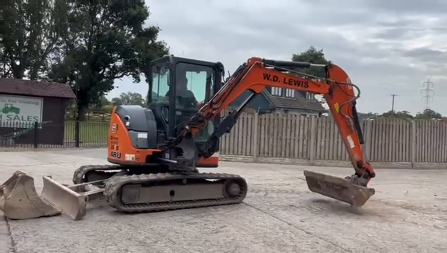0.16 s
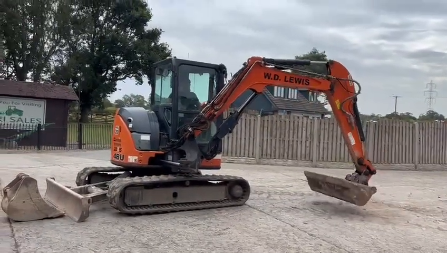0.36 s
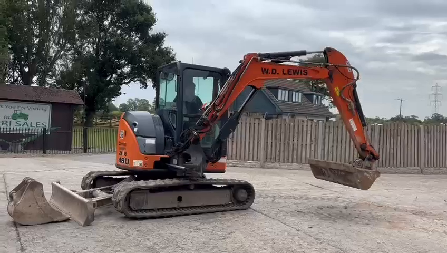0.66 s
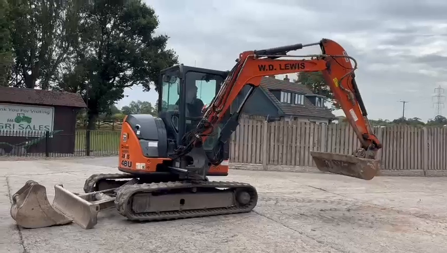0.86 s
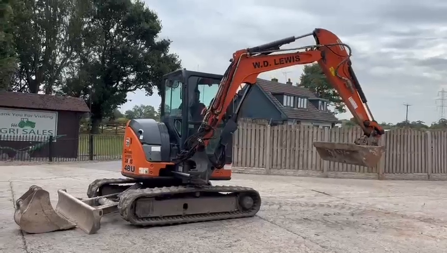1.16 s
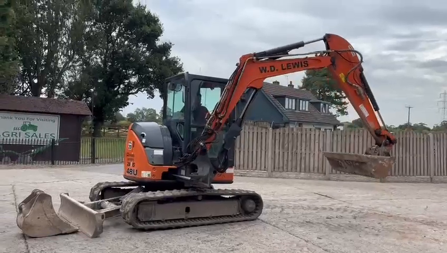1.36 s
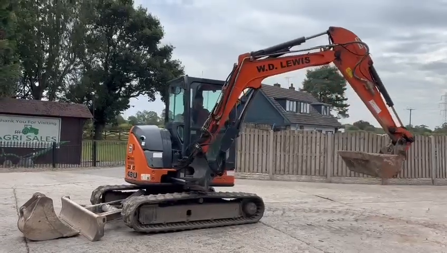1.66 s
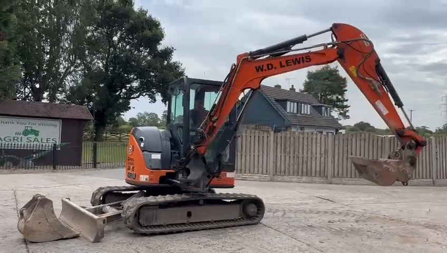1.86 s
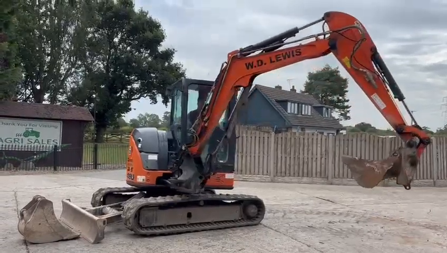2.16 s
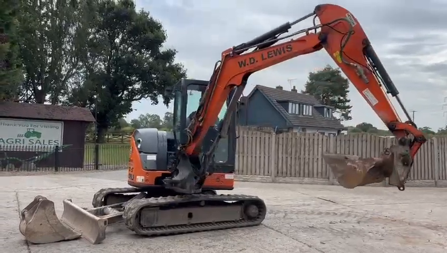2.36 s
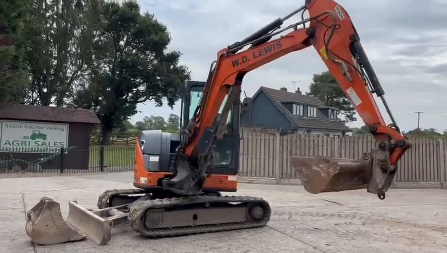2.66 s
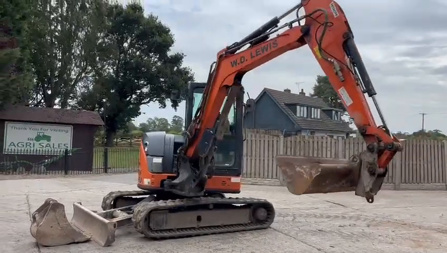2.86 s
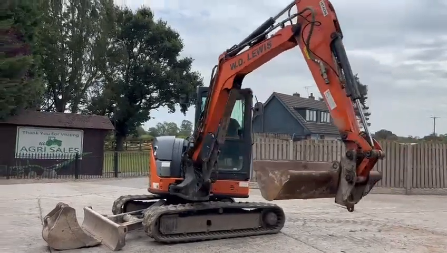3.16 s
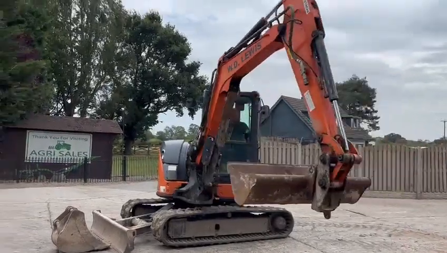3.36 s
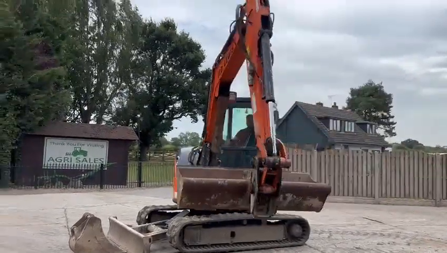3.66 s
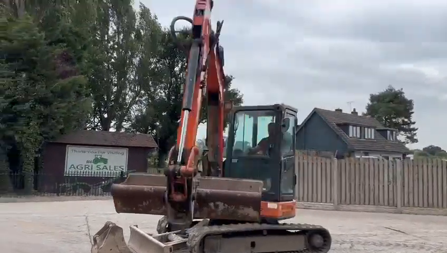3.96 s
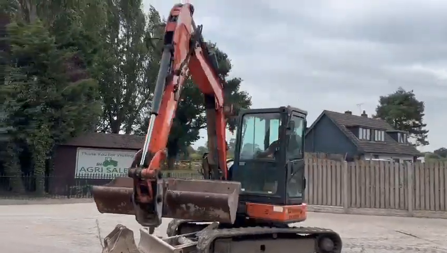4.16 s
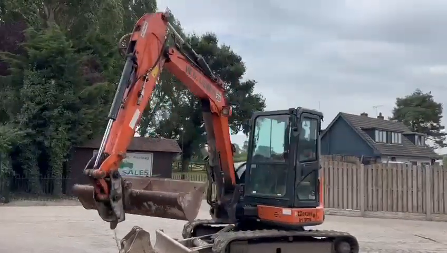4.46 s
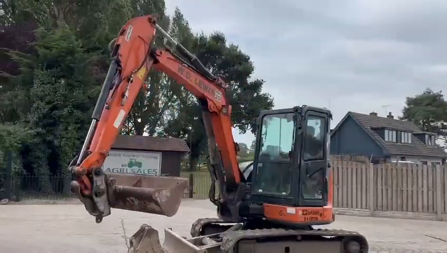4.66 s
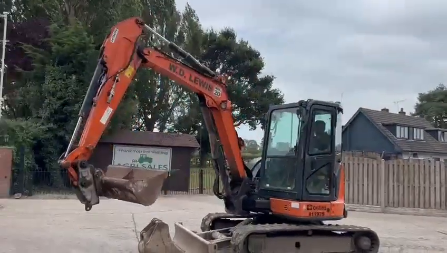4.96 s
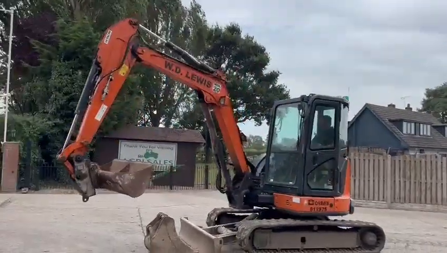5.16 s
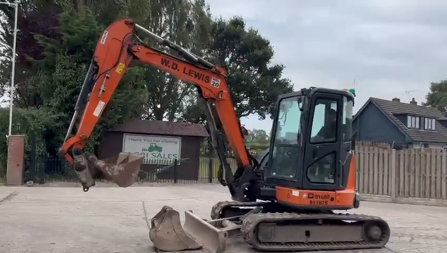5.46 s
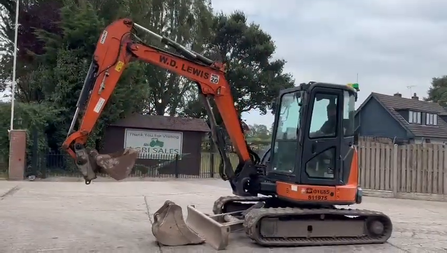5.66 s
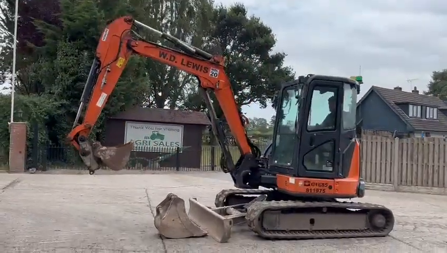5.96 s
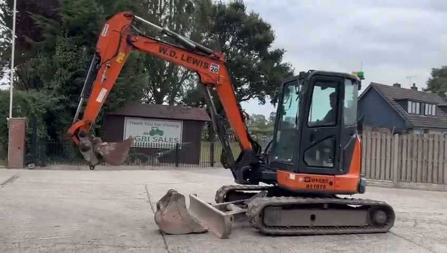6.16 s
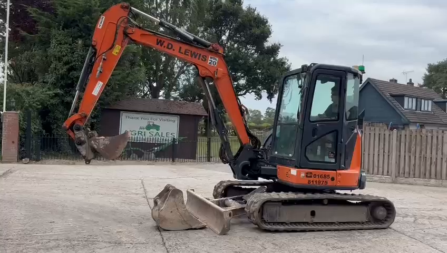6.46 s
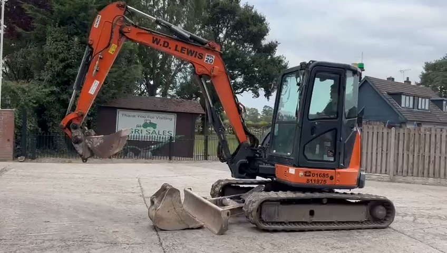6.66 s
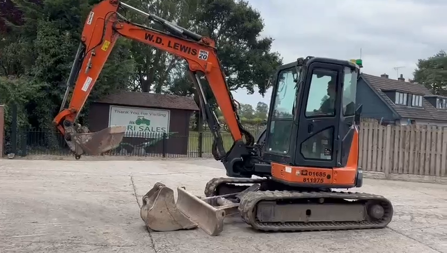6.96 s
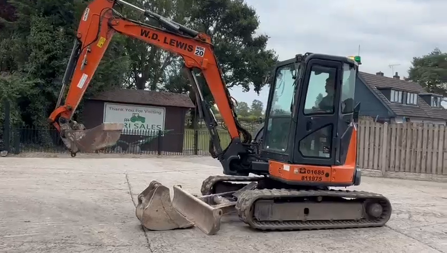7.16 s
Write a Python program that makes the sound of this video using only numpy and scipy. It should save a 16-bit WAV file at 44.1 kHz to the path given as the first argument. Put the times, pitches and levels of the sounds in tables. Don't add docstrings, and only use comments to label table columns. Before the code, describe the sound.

Gritty bucket scrape, thumps and metal knocks give way to a steady excavator engine with hydraulic whine, small squeaks and late wind rumble.

```python
import sys
import numpy as np
from scipy import signal
from scipy.fft import rfft, irfft, next_fast_len
from scipy.io import wavfile
from scipy.ndimage import uniform_filter1d, map_coordinates

SR = 44100
rng = np.random.default_rng(int(sys.argv[2]) if len(sys.argv) > 2 else 0)


def generate_wav(sig):
    pcm = np.round(np.clip(np.atleast_2d(sig).T, -1, 1) * 32767).astype(np.int16)
    wavfile.write(sys.argv[1], SR, pcm)


def volts_from_decibels(level):
    exponent = np.asarray(level, float) / 20
    return 10 ** exponent


N = 322193

# (time [s], firing rate [Hz])
FIRING_RATE = [(0, 62.6), (0.9, 63.05), (1.38, 62.5), (1.62, 63.2), (2.15, 63.2), (2.38, 64.3),
               (2.62, 63.5), (2.88, 62.6), (3.13, 62.45), (3.38, 62.1), (3.62, 62.85), (4.1, 63.1),
               (4.65, 63.1), (4.88, 63.6), (6.4, 63.65), (6.62, 63.2), (6.88, 63.5), (7.31, 63.3)]
# (time [s], firing tone [dB], its octave [dB])
THROB = [(0, -22.5, -39), (.16, -35, -28), (.5, -22, -24.5), (1.3, -21.5, -22.5), (1.54, -23.5, -21.5),
         (1.68, -19.5, -23.5), (2.26, -21.5, -24.5), (2.45, -24, -35), (2.85, -22, -27), (3.5, -19, -27),
         (4.35, -19.5, -31.5), (5.05, -19.5, -25.5), (5.3, -24.5, -25), (5.55, -21.5, -24.5),
         (5.75, -20, -29), (6.38, -42.5, -29.5), (6.72, -24, -24), (7.31, -22, -23)]
# (multiple of firing, level re firing tone [dB])
EXHAUST_ORDERS = [(.75, -36), (1.25, -28), (1.5, -62), (1.75, -19), (2.25, -34), (3, -25), (3.5, -28.5),
                  (4, -34.5), (7, -37)]
# (multiple of firing, level re pump tone [dB])
GEAR_PUMP_ORDERS = [(11, -25), (16.5, -24), (22, -29)]
# (start [s], end [s], tone level [dB])
GEAR_PUMP_LOAD = [(-.1, .08, -25), (.36, .6, -38), (.78, 1.04, -37), (1.2, 1.44, -37), (1.62, 1.72, -32),
                  (1.97, 2.2, -36), (2.86, 3.1, -38), (3.26, 3.5, -37.5), (3.5, 4.25, -38),
                  (4.3, 5.25, -34), (5.55, 5.82, -34), (6.24, 6.36, -37), (6.54, 7.4, -34.5)]
# (start [s], end [s], tone level [dB])
PISTON_PUMP_LOAD = [(.08, .2, -36), (.36, .5, -39), (.52, 1.6, -46.5), (1.9, 2.02, -46.5),
                    (2.48, 2.86, -46.5), (3.4, 3.72, -45), (3.8, 4.08, -49), (4.14, 5.66, -44),
                    (5.82, 6.22, -45), (6.24, 7.4, -40)]
# (multiple of firing, start [s], end [s], level [dB])
VALVE_WHINES = [(4, 3.15, 3.75, -41), (4, 3.6, 4.4, -46), (11, 2.9, 4.6, -59), (11, 4.9, 6.1, -55),
                (11, 6.3, 6.9, -56), (7, 3.5, 5.2, -56), (16.5, 2.6, 4.1, -61), (16.5, 5.2, 5.6, -55),
                (16.5, 6.3, 7.3, -59), (49.5, 1.9, 2.3, -66), (49.5, 4.3, 4.8, -66), (44, 4, 5.1, -65),
                (44, 6.7, 7.3, -63), (15.5, 3.4, 3.9, -56), (15.5, 4.7, 5.3, -55), (22, 2.2, 3, -59),
                (29, 4.9, 5.45, -54), (30, 4.95, 5.5, -58), (29, 6.1, 7.3, -60), (21, 6, 7.3, -56),
                (27.5, 6.7, 7.3, -59), (16.5, 4.2, 5.3, -51.5), (16.5, 5.8, 6.3, -53)]
# (time [s], fan tone [dB], distance off the phone's axis [0-1])
FAN_GRILLE = [
    (0, -50.5, 0),
    (1.9, -39, 0.1),
    (3, -42, 0),
    (4, -45.5, 0.1),
    (4.5, -39.5, 0.3),
    (5.6, -32.5, 0.68),
    (6.3, -38.5, 1),
    (6.75, -31.5, 0.75),
    (7.31, -29, 0.7),
]
# (time [s], level [dB])
CLATTER_LEVEL = [(0, -37), (.6, -40), (1.5, -41), (2.2, -42), (3, -43), (4, -42.3), (5, -41.5),
                 (5.8, -40.5), (6.3, -39.5), (7.31, -39.5)]
# (frequency [Hz], level per Hz [dB])
CLATTER_COLOUR = [(250, -31.5), (420, -9), (750, -11), (1010, -6.5), (1240, -14), (1900, -16), (2600, -21),
                  (3200, -23), (4600, -31), (5200, -36.5), (6600, -40.5), (8300, -48.5), (10000, -50.5),
                  (11500, -62)]
# (frequency [Hz], width [Hz], gain [dB])
COVER_PANELS = [(1100, 240, -0.5), (1490, 290, 3.5), (1870, 180, 3.5), (2475, 450, 4)]

# (time [s], level [dB], hold [s], brightness [dB])
SCRAPE_STROKES = [(.0, -15.5, .045, 4), (0.056, -22, 0.04, -0.5), (.098, -23.5, .015, 0),
                  (.115, -32, .02, 8), (0.144, -28, 0.04, 6), (.205, -34.5, 0.03, 5), (.265, -47, .02, -2),
                  (.32, -43, .015, 4), (0.338, -19.5, .01, -1), (0.357, -18.5, 0.011, 1),
                  (0.38, -28, .02, -5), (0.416, -30.5, 0.022, -5), (0.476, -35.5, 0.017, -9),
                  (0.585, -30, .04, -12), (.7, -40, 0.74, -13), (.775, -45, .01, 7),
                  (1.199, -27.5, .02, -5), (1.27, -39, .03, 4), (1.332, -33.5, .012, 3),
                  (1.384, -36, .006, 7), (1.396, -26.5, 0.02, -5), (1.45, -35.5, .02, -6)]
# (frequency [Hz], level per Hz [dB])
GRIT_COLOUR = [(400, -29), (750, -5), (1220, -5), (1710, -7), (3000, -17.5), (4600, -25), (8200, -38),
               (10000, -85), (13000, -100)]
# (frequency [Hz], width [Hz], level [dB], not used)
BUCKET_PLATES = [(840, 63, 1), (1234, 66, -3), (1610, 50, -2.5), (2450, 85, -7), (2940, 110, -12.5),
                 (3440, 14, -19), (4600, 120, -17.5), (5070, 34, -26), (5670, 59, -24)]
# (time [s], peak level [dB], brightness [dB])
PIN_KNOCKS = [(0.0144, -21, -0.5), (0.034, -15.5, 5), (.047, -17.5, 1), (0.0702, -9.5, 0), (.083, -15, 1.5),
              (0.0972, -22, -1), (.1376, -21, 3), (0.158, -17.5, 6.5), (.178, -25, -5), (0.226, -27, -4),
              (.2653, -31, -3), (.2738, -34.5, -3), (.3202, -30.5, 9), (0.3381, -15, 2), (0.3436, -18.5, 3),
              (0.3586, -12.5, 2), (0.368, -23.5, 3), (.386, -31, -6), (0.4176, -25.5, 10), (0.4763, -24, 2),
              (0.5837, -41, -3), (0.7757, -28.5, 7), (1.1997, -25.5, -10), (1.214, -34, 4),
              (1.2596, -33, 0), (1.3379, -34, 0.5), (1.3863, -30, 7), (1.3978, -17.5, -11),
              (1.758, -31.5, 5), (2.147, -30, 5)]
# (frequency [Hz], level [dB], 60 dB decay [s])
STEEL_RINGS = [(818, -1.5, 0.14), (980, -13.5, 0.054), (1182, -5, 0.23), (1374, -1, 0.097),
               (1770, -8.5, .12), (1810, -11, .12), (2220, -5.5, 0.067), (2800, -13, .1),
               (3760, -20.5, 0.11), (3870, -20.5, 0.15), (4550, -19.5, .12), (5400, -21, .06),
               (6060, -23, 0.094), (6600, -27, .05)]
# (time [s], peak level [dB], frequency [Hz])
FLOOR_THUMPS = [(0.004, -21, 303), (0.02, -3.5, 254), (0.037, -0.5, 259), (0.054, -27, 272),
                (0.074, 0, 224), (0.099, -1.5, 262), (0.124, -19, 257), (0.159, -3.5, 261),
                (0.18, -5.5, 266), (0.21, -15.5, 259), (0.244, -14, 245), (0.418, -12.5, 253)]
# (time [s], level [dB], frequency [Hz])
BUSH_SQUEAKS = [
    (1.277, -59, 7900),
    (2.088, -58, 5750),
    (2.09, -70, 6950),
    (2.204, -58, 7600),
    (2.206, -61, 5750),
    (3.25, -51, 4400),
]

# (time [s], rumble level
# [dB], boom level [dB], duration [s])
LOW_SWELLS = [(0.032, -22, -18.5, 0.095), (0.43, -32.5, -25, 0.064), (0.66, -27, -29, 0.12),
              (1.048, -25, -32, 0.12), (1.318, -26.5, -31, 0.28), (1.538, -29.5, -37.5, 0.26),
              (1.902, -28.5, -34.5, 0.15), (2.214, -31.5, -34.5, 0.2), (2.597, -32, -44.5, 0.034),
              (2.877, -29.5, -46, 0.016), (3.067, -30, -44, 0.033), (4, -32, -40.5, 0.17),
              (5.29, -28, -41, 0.066), (5.616, -24.5, -36, 0.17), (5.772, -22, -39, 0.076),
              (5.956, -21, -35, 0.033), (6.097, -37, -36, 0.076), (6.351, -32.5, -44, 0.057),
              (6.746, -38, -34.5, 0.078), (7.025, -31, -36, 0.043), (7.182, -30, -36.5, 0.025)]
# (frequency [Hz], level per Hz [dB])
RUMBLE_COLOUR = [(20, -38), (35, -7.5), (55, 7), (100, 1.5), (150, -3.5), (230, -7), (500, -120)]
# (frequency [Hz], level per Hz [dB])
BOOM_COLOUR = [(90, -64.5), (160, 0), (250, 1.5), (400, -4), (600, -10), (800, -14), (1100, -32.5),
               (2000, -120)]
# (time [s], likeness [0-1])
RUMBLE_LIKENESS = [(0, 1), (5.2, 0.9), (5.4, 0.96), (6.0, 0.89), (6.4, 0.8), (7.31, 0.99)]
# (time [s], peak level [dB], frequency [Hz], pan [dB])
GUST_POPS = [(0.399, -9, 222, 2.5), (0.418, -8, 410, 2), (0.427, -12, 294, 1.5), (0.433, -21, 514, 3),
             (0.459, -21, 288, 0), (0.487, -11.5, 240, -2), (0.531, -17, 327, -1),
             (0.619, -18.5, 227, -0.5), (0.716, -19.5, 650, -3), (1.012, -23, 352, 1), (1.208, -32, 412, 2),
             (1.23, -18.5, 230, -0.5), (1.301, -23, 415, -2), (1.362, -19, 246, -2),
             (1.407, -18, 243, -0.5), (1.858, -21, 246, 0.5), (1.889, -22.5, 476, 1.5),
             (1.935, -21, 355, 0), (2.139, -17, 346, -0.5), (2.148, -23.5, 450, -2), (2.2, -30, 450, -2),
             (2.417, -35, 437, -7), (2.381, -24, 241, -3.5), (3.121, -19, 223, -2), (3.179, -18.5, 250, 1),
             (3.953, -32, 540, 2), (3.955, -18.5, 180, -5), (5.343, -26, 345, 0), (5.538, -27, 384, 5),
             (5.551, -13.5, 416, 4.5), (5.613, -24.5, 340, 2), (5.62, -27.5, 610, 2), (5.742, -27, 270, 2),
             (5.768, -17, 658, 9.5), (5.87, -21.5, 647, 2.5), (5.926, -19, 290, -8), (5.95, -31, 700, -2),
             (6.008, -26, 257, 0), (6.156, -28, 350, 8), (6.292, -17.5, 572, -2), (5.697, -18, 256, 0),
             (5.767, -17.5, 420, 4), (5.788, -9.5, 241, 1), (5.894, -22, 330, 6), (5.959, -14, 249, -2),
             (6.039, -25, 223, 11), (6.119, -28.5, 228, -1.5), (6.298, -15.5, 331, -1.5),
             (6.426, -22.5, 327, -11), (6.728, -25.5, 353, -4)]
# (time [s], peak level [dB], frequency [Hz])
GUST_PUSHES = [(5.28, -11.5, 72.7), (5.555, -4, 147), (5.613, -13, 74), (5.655, -6.5, 90.4),
               (5.701, -5.5, 93), (5.75, -3, 101.5), (5.77, -2.5, 90.6), (5.8, -10.5, 71),
               (5.888, -5.5, 69.7), (5.912, -9, 81), (5.962, -10, 94), (5.986, -9.5, 104),
               (6.022, -12, 119), (6.058, -16, 127), (6.12, -16.5, 158)]

# (frequency [Hz], start [s], end [s], level [dB])
CIRCUIT_WHISTLES = [
    (9475, .5, 4.1, -93),
    (9700, .45, 4.1, -93),
    (9475, 4.6, 6, -97),
    (9700, 4.3, 5.9, -97),
    (11300, .12, .26, -84),
    (11250, 3.9, 4.1, -93),
    (11250, 5.2, 5.9, -97),
]
# (frequency [Hz], left-right likeness [0-1])
PORT_LIKENESS = [(60, 0.78), (130, 0.82), (260, 0.95), (550, 0.7), (1000, 0.65), (1500, 0.45), (2400, .5),
                 (3400, .55), (4400, 0.75), (5300, 0.55), (6500, .96), (7600, 0.86), (9300, 0.8)]
# (frequency [Hz], left lead [rad])
PORT_LEAD = [(0, 0), (600, -0.1), (860, 1.4), (1380, 1.0), (1980, 5.9), (2500, 6.5), (2930, 6.6),
             (4820, 6.3), (5600, 5.5), (6120, 6.3), (7920, 6.2), (8270, 5.9), (9040, 3.1), (10900, 3.2)]
# (frequency [Hz], left minus right [dB])
PORT_BALANCE = [(60, -.1), (200, -1), (400, -2), (800, -3), (1500, .5), (3000, 1.4), (6000, 0), (9000, -.8)]

VALVE_DB_PER_S = 149.5
BRIGHT_HZ = 3400


def unit(x):
    return x / np.sqrt(np.mean(x ** 2) + 1e-20)


def along(points, hz):
    f, v = np.transpose(points)
    return np.interp(np.log(hz + 1), np.log(f + 1), v)


def curves(rows):
    s, *cols = np.transpose(rows)
    return [np.interp(np.arange(N) / SR, s, c) for c in cols]


def wobble(rate):
    knots = rng.standard_normal(int(N * rate / SR) + 4)
    return map_coordinates(knots, [np.arange(N) * rate / SR])


def spells(rows, rise, fall, rest_db):
    t = np.arange(N) / SR
    level = np.full(N, float(rest_db))
    for start, end, db in rows:
        before, after = np.maximum(start - t, 0), np.maximum(t - end, 0)
        level = np.maximum(level, db - rise * before - fall * after)
    return level


def filtered(x, response):
    m = next_fast_len(N + SR // 2)
    return irfft(rfft(x, m) * response(np.fft.rfftfreq(m, 1 / SR)), m)[..., :N]


def bumps(modes, hz):
    return volts_from_decibels(sum(db / (1 + (2 * (hz - c) / w) ** 2) for c, w, db in modes))


def patchy(depth_db):
    z = signal.stft(rng.standard_normal((2, N)), nperseg=1024)[2]
    field = uniform_filter1d(rng.standard_normal(z.shape[1:]), size=2, axis=0)
    field = uniform_filter1d(field, size=10, axis=1)
    return signal.istft(z * volts_from_decibels(depth_db * unit(field)), nperseg=1024)[1][:, :N]


def ports(pair, gain):
    def shares(hz):
        turn = np.arccos(np.clip(along(PORT_LIKENESS, hz), -1, 1)) / 2
        return gain(hz) * [np.cos(turn), np.sin(turn)]

    mid, side = filtered(pair, shares)
    halves = np.array([[.5], [-.5]])
    return filtered(np.array([mid + side, mid - side]), lambda hz: np.exp(1j * along(PORT_LEAD, hz) * halves))


def in_band(x, lo_hz, hi_hz):
    band = filtered(x.mean(axis=0), lambda hz: (hz > lo_hz) & (hz < hi_hz))
    return x / np.std(band)


def tone(cycles, db, lag, unsteady_db, spread):
    turn = 2 * np.pi * cycles + lag + spread * np.array([[1], [-1]])
    return np.sqrt(2) * volts_from_decibels(db + unsteady_db * wobble(12)) * np.cos(turn)


def puffs(rows, rings, rough, rise, fall):
    out, t = np.zeros((2, N + SR)), np.arange(SR // 8) / SR
    for s, db, hz, *pan in rows:
        ragged = uniform_filter1d(rng.standard_normal(len(t)), size=40)
        cycles = hz * (t + fall * rise * (1 - np.exp(-t / rise)))
        wave = np.sin(2 * np.pi * cycles) + rough * unit(ragged)
        shape = (1 - np.exp(-t / rise)) * volts_from_decibels(-60 * t * hz / rings)
        level = volts_from_decibels(db - 5.0 + sum(pan) * np.array([[.5], [-.5]]))
        out[:, round(s * SR):][:, :len(t)] += level * wave * shape / shape.max()
    return filtered(out[:, :N], lambda f: 1 / (1 + (f / 780) ** 6))


def overtones(fired, base_db, orders, aside):
    return sum(tone(k * fired, base_db + db, rng.uniform(0, 2 * np.pi), unsteady_db=2.5, spread=.3 * aside)
               for k, db in orders)


def exhaust(fired, aside):
    first_db, octave_db = curves(THROB)
    sound = tone(fired, first_db, 0, unsteady_db=.7, spread=.03 * aside)
    sound += tone(2 * fired, octave_db, lag=2.7, unsteady_db=1.1, spread=.2 * aside)
    return sound + overtones(fired, first_db, EXHAUST_ORDERS, aside)


def clatter(fired):
    clatter_db, = curves(CLATTER_LEVEL)
    cycle = 2 * np.pi * fired / 4
    swing = volts_from_decibels(7 * np.cos(cycle)) * rng.standard_normal((2, N))
    cover = volts_from_decibels(-11) * unit(filtered(swing, lambda f: 1 / (1 + (2 * (f - 1030) / 160) ** 2)))
    knock_db = 1.5 + 1.1 * rng.standard_normal(int(fired[-1]) + 1)
    beat_db = knock_db[fired.astype(int)] * np.exp(-4 * (fired % 1))
    beat_db += 1.2 * np.cos(cycle) + .6 * np.cos(3 * cycle)
    noise = volts_from_decibels(beat_db) * patchy(depth_db=2.0)
    block = ports(noise, lambda f: volts_from_decibels(along(CLATTER_COLOUR, f)) * bumps(COVER_PANELS, f))
    return volts_from_decibels(clatter_db) * cover + volts_from_decibels(clatter_db - 1.7) * in_band(block, 824, 6000)


def pumps(fired, aside):
    gear_db = spells(GEAR_PUMP_LOAD, VALVE_DB_PER_S, VALVE_DB_PER_S, rest_db=-45.5)
    piston_db = spells(PISTON_PUMP_LOAD, VALVE_DB_PER_S, VALVE_DB_PER_S, rest_db=-55.5)
    sound = tone(5.5 * fired, gear_db, 0, unsteady_db=1.3, spread=.25 * aside)
    sound += tone(9 * fired, piston_db, 0, unsteady_db=.9, spread=.4)
    return sound + overtones(fired, gear_db, GEAR_PUMP_ORDERS, aside)


def valve_whines(fired, aside):
    sound = 0
    for k, start, end, db in VALVE_WHINES:
        valve_db = spells([(start + .1, end - .1, 0)], VALVE_DB_PER_S, VALVE_DB_PER_S, -90)
        cycles = k * fired + .15 * wobble(20)
        sound = sound + tone(cycles, db + 1.5 + valve_db, 0, unsteady_db=3, spread=.5 * aside)
    return sound


def fan(fired, aside):
    fan_db = curves(FAN_GRILLE)[0] + 1.5 * wobble(4.3)
    slip = np.cumsum(1.54 * wobble(14)) / SR
    return tone(2.9 * fired + slip, fan_db, 0, unsteady_db=2.0, spread=0.3 * aside)


def engine():
    fired = np.cumsum(curves(FIRING_RATE)[0]) / SR
    aside = curves(FAN_GRILLE)[1]
    sound = exhaust(fired, aside) + clatter(fired) + pumps(fired, aside)
    return sound + valve_whines(fired, aside) + fan(fired, aside)


def scrape_and_knocks():
    plates = [(hz, width, 6) for hz, width, _ in BUCKET_PLATES]
    grit = volts_from_decibels(3 * wobble(220)) * patchy(depth_db=2.5)
    steel = ports(grit, lambda f: volts_from_decibels(along(GRIT_COLOUR, f)) * bumps(plates, f))
    steel = in_band(steel, 770, 8000)
    bright = filtered(steel, lambda f: 1 / (1 + (BRIGHT_HZ / (f + 1)) ** 4))
    sound, t = np.zeros((2, N)), np.arange(SR // 10) / SR
    blow = (1 - np.exp(-t / 0.00067)) * (1 - t / t[-1])
    for part, share in ((steel - bright, 0), (bright, 1)):
        strokes = [(s, s + hold, db - 7.0 + share * up) for s, db, hold, up in SCRAPE_STROKES]
        force = volts_from_decibels(spells(strokes, rise=2997.5, fall=228.5, rest_db=-120))
        for s, db, up in PIN_KNOCKS:
            force[round(s * SR):][:len(t)] += volts_from_decibels(db + share * up - 19.0 - 60 * t / 0.024) * blow
        sound += part * force
    return sound


def pin_rings():
    sound, t = np.zeros((2, N)), np.arange(SR // 10) / SR
    hz, mode_db, t60 = np.transpose(STEEL_RINGS)[:, :, None]
    lead = along(PORT_LEAD, hz) * np.array([.5, -.5])[:, None, None]
    onset = (1 - np.exp(-t / .0008)) * (1 - t / t[-1])
    chances = rng.standard_normal((len(PIN_KNOCKS), len(STEEL_RINGS), 1))
    for (s, db, up), luck in zip(PIN_KNOCKS, chances):
        level_db = db - 15 + mode_db + 5.5 * luck + up * (hz > BRIGHT_HZ)
        size = volts_from_decibels(level_db - 60 * t / t60) * onset
        ringing = size * np.sin(2 * np.pi * hz * t + lead + 3 * luck)
        sound[:, round(s * SR):][:, :len(t)] += ringing.sum(axis=1)
    return sound


def bucket():
    thumps = puffs(FLOOR_THUMPS, rings=16.3, rough=0.21, rise=0.0098, fall=0.065)
    return scrape_and_knocks() + pin_rings() + thumps


def squeaks():
    t = np.arange(N) / SR
    return sum(volts_from_decibels(db) * np.exp(-((t - s) / 0.0063) ** 2) * np.sin(2 * np.pi * hz * t)
               for s, db, hz in BUSH_SQUEAKS)


def gust_buffets():
    pops = puffs(GUST_POPS, rings=17.6, rough=0.52, rise=0.0039, fall=0.32)
    return pops + puffs(GUST_PUSHES, rings=7.8, rough=0.049, rise=0.0036, fall=0.64)


def low_noise():
    rumble_spells = [(s - w / 2, s + w / 2, db) for s, db, _, w in LOW_SWELLS]
    boom_spells = [(s - w / 2, s + w / 2, db) for s, _, db, w in LOW_SWELLS]
    rumble_db = spells(rumble_spells, 80, 80, rest_db=-36.5)
    boom_db = spells(boom_spells, 39, 39, rest_db=-41.5)
    turn = np.arccos(np.clip(curves(RUMBLE_LIKENESS)[0], 0, 1)) / 2
    deep = volts_from_decibels(2.3 * wobble(25)) * rng.standard_normal((2, N))
    mid, side = filtered(deep, lambda f: volts_from_decibels(along(RUMBLE_COLOUR, f)))
    rumble = mid + np.tan(turn) * volts_from_decibels(4.5 * wobble(8.5)) * np.array([side, -side])
    lumpy = volts_from_decibels(2.0 * wobble(30)) * rng.standard_normal((2, N))
    boom = ports(lumpy, lambda f: volts_from_decibels(along(BOOM_COLOUR, f)))
    return volts_from_decibels(rumble_db - 2.07) * in_band(rumble, 74.0, 110) + volts_from_decibels(boom_db - 2.0) * in_band(boom, 180, 325)


def whistles():
    t = np.arange(N) / SR
    return sum(tone(hz * t + .3 * wobble(60), spells([(start, end, db)], 300, 300, -140), 0, unsteady_db=6, spread=0)
               for hz, start, end, db in CIRCUIT_WHISTLES)


def scene():
    return engine() + bucket() + squeaks() + gust_buffets() + low_noise() + whistles()


def low_pass(x):
    return signal.sosfilt(signal.butter(12, 11300, fs=SR, output="sos"), x)


def record(dry):
    halves = np.array([[.5], [-.5]])
    tilted = filtered(dry, lambda hz: volts_from_decibels(along(PORT_BALANCE, hz) * halves))
    rounded = tilted / (1 + np.abs(tilted / .95) ** 6) ** (1 / 6)
    t = np.arange(N) / SR
    edges = np.sin(np.pi / 2 * np.clip(np.minimum(t, t[::-1]) / .002, 0, 1)) ** 2
    return low_pass(rounded * edges)


dry = scene()
out = record(dry)
generate_wav(out)
```